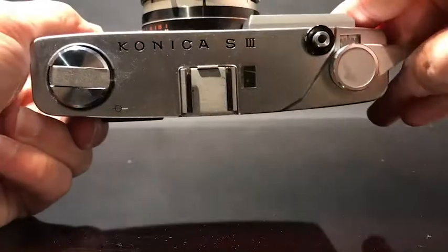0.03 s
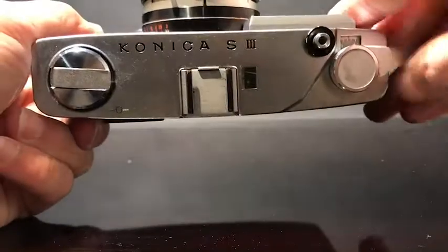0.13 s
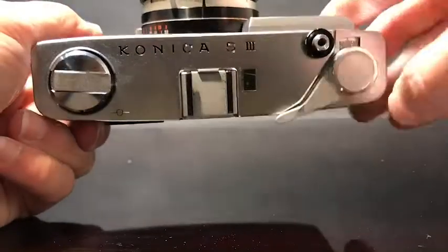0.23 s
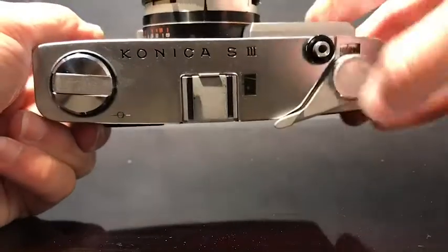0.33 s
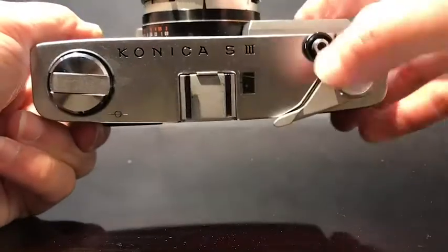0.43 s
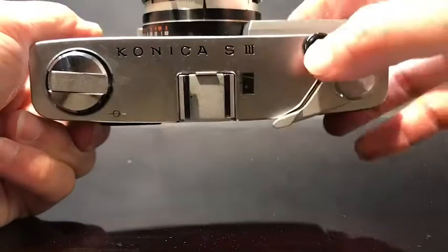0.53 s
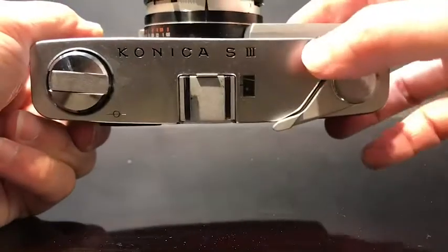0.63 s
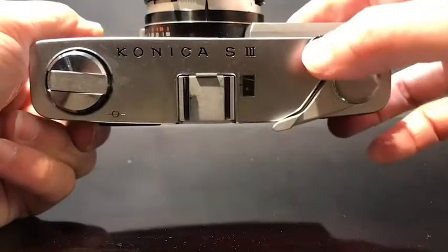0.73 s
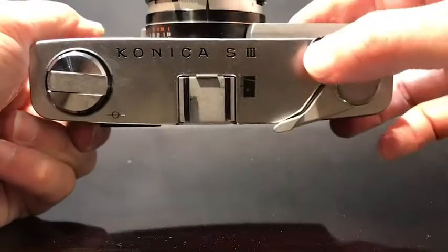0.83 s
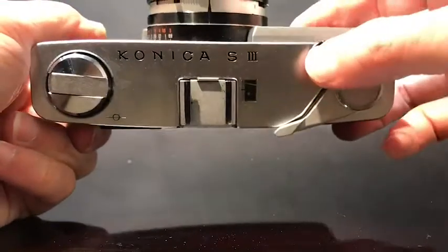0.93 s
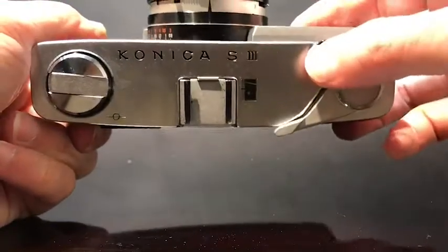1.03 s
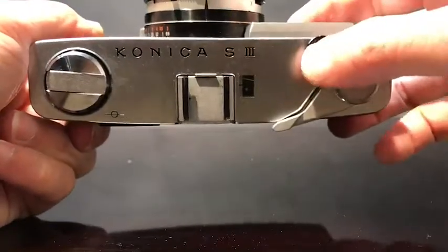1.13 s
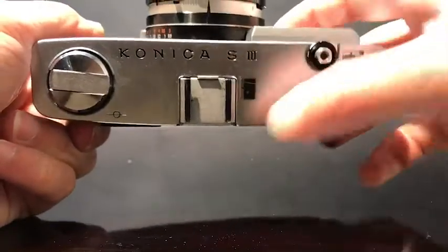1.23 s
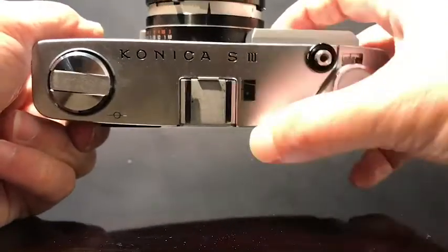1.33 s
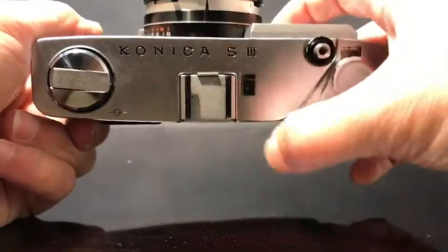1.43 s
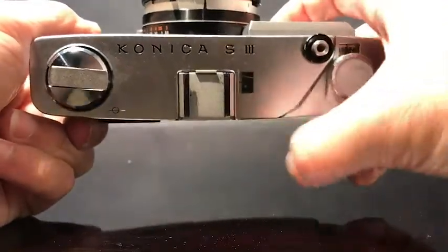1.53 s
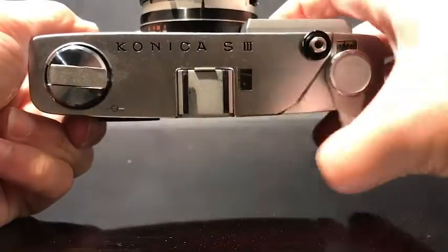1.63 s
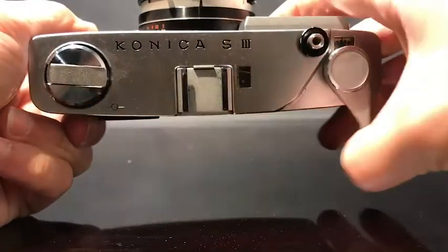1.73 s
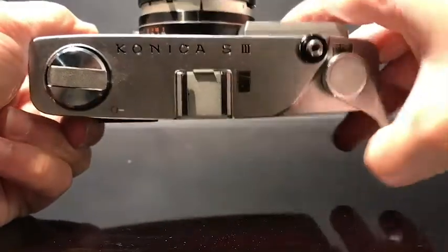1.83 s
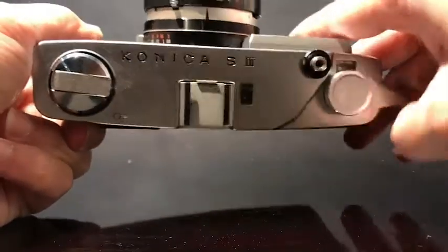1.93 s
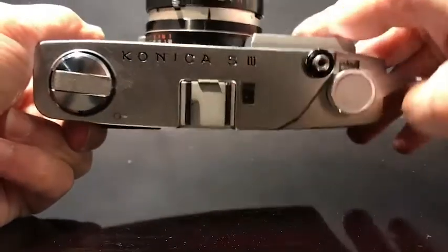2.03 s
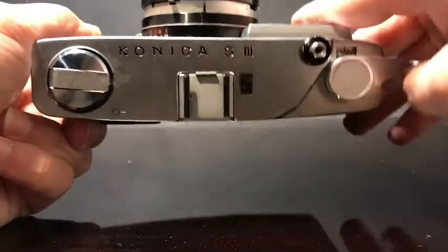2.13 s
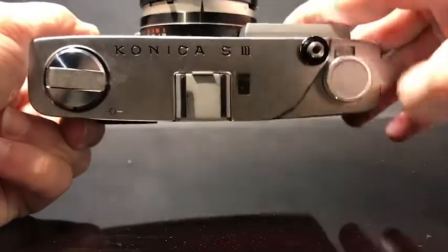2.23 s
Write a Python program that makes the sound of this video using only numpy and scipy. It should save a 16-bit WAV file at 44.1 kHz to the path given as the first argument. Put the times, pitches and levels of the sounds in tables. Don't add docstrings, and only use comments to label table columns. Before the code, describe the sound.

Mechanical camera clicks: a hard lever clack, shutter firing, button springing back, quick ratchet winding

```python
import sys
import numpy as np
from scipy import signal
from scipy.fft import rfft, irfft
from scipy.io import wavfile

SR = 44100
rng = np.random.default_rng(int(sys.argv[2]) if len(sys.argv) > 2 else 0)


def voltage_ratio(level):
    return 10 ** (np.asarray(level, float) / 20)


def wav_record(signal):
    frames = np.transpose(np.atleast_2d(signal))
    bounded = np.clip(frames, -1, 1)
    quanta = np.round(bounded * 32767).astype(np.int16)
    wavfile.write(sys.argv[1], SR, quanta)


N = 101430
LOW_CUT_HZ = 214


def seconds():
    return np.arange(N) / SR


def rms_one(x):
    return x / np.sqrt(np.mean(x ** 2) + 1e-20)


def curve(rows):
    return np.interp(seconds(), *np.transpose(rows))


def highpass(x, order, cut_hz):
    return signal.sosfilt(signal.butter(order, cut_hz, "high", fs=SR, output="sos"), x)


def coloured(points):
    hz, db = np.transpose(points)
    f = np.maximum(np.arange(N // 2 + 1) * SR / N, 1)
    gain_db = np.interp(np.log(f), np.log(hz), db, left=-90)
    return rms_one(irfft(rfft(rng.standard_normal(N)) * voltage_ratio(gain_db), N))


def bursts(s, db, decay_ms):
    age_s = seconds() - np.asarray(s)[:, None]
    decay_s = np.reshape(decay_ms, (-1, 1)) / 1000
    shape = (age_s >= 0) * np.exp(-np.maximum(age_s, 0) / decay_s)
    return voltage_ratio(db) @ shape


def ring(force, modes):
    out = 0
    kick = np.diff(force, prepend=0) + 1e-18
    for k, (hz, db, t60_s) in enumerate(modes):
        r = voltage_ratio(-60 / (t60_s * SR))
        w = 2 * np.pi * hz / SR
        gain = np.sin(w) / (2 * np.sin(w / 2))
        mode = signal.lfilter([gain], [1, -2 * r * np.cos(w), r * r], kick)
        out = out + (-1) ** k * voltage_ratio(db) * mode
    return out


def strike(envelope, colour, modes, ring_db, tail):
    tail_colour, tail_db, t60_s = tail
    crack = envelope * coloured(colour) / 2
    blows = np.maximum(np.diff(envelope, prepend=0), 0)
    body = voltage_ratio(ring_db) * ring(blows, modes)
    wash_power = signal.lfilter([1 / 200], [1, -voltage_ratio(-120 / (t60_s * SR))], envelope ** 2)
    wash = voltage_ratio(tail_db) * np.sqrt(wash_power) * coloured(tail_colour)
    return highpass(crack + body + wash, 4, LOW_CUT_HZ)


def lever():
    # t/s, level/dB, decay/ms
    lever_contacts = [
        (0.2232, -26.5, 0.56),
        (0.2336, -14.5, 1.6),
        (.2380, -9, 4.1),
        (0.2412, -20, 2.6),
        (0.2451, -6, 1.35),
        (0.2469, 0.5, 0.8),
        (0.2502, -18.5, 5),
        (0.26, -19, 1.5),
    ]
    # f/Hz, level/dB
    lever_colour = [(350, -51), (600, -3.5), (3480, -2.5), (7520, -5.5), (13600, -1.5), (16000, 0.5)]
    # f/Hz, level/dB, t60/s
    lever_modes = [(564, 1, 0.018), (1090, -16, 0.011), (8370, 15, 0.003)]
    # spectrum (f/Hz, level/dB), level/dB, t60/s
    lever_tail = [(500, -4.5), (2000, -9), (8000, -1.5), (14000, -6.5), (16000, -3)], -28.5, 0.29
    stop_hits = [.24476, .24672]
    dip_s, dip_db = .00015, 1.5
    age = (seconds() - np.array(stop_hits)[:, None]) / dip_s
    push = np.sum(np.exp(-4 * age ** 2) - voltage_ratio(dip_db) * np.exp(-4 * (age + 1) ** 2), axis=0)
    stop = voltage_ratio(-5.5) * signal.lfilter(*signal.butter(1, 450, "high", fs=SR), push)
    return strike(bursts(*np.transpose(lever_contacts)), lever_colour, lever_modes, -19, lever_tail) + stop


def jolt():
    rise_s, decay_s = 0.0028, 0.0094
    end_hz, extra_turns, glide_s = 53.7, 1.1, 0.0026
    age_s = np.maximum(seconds() - .2472, 0)
    turns = end_hz * age_s + extra_turns * (1 - np.exp(-age_s / glide_s))
    swing = (1 - np.exp(-age_s / rise_s)) * np.exp(-age_s / decay_s) * np.sin(2 * np.pi * turns)
    rebound_s, rebound_length_s, rebound_hz = .297, .055, 48
    late = np.clip((seconds() - rebound_s) / rebound_length_s, 0, 1)
    rebound = np.sin(np.pi * late) * np.sin(2 * np.pi * rebound_hz * seconds())
    return voltage_ratio(2) * swing + voltage_ratio(-40) * rebound


def shutter():
    # t/s, level/dB, decay/ms
    blades = [
        (.9288, -6.5, 1.6),
        (.9303, 0, .8),
        (.9319, -15.5, 1.5),
        (0.933, -23.5, 4.1),
        (.9393, -22.5, 2.0),
        (.9405, -13.5, 1.5),
        (.9430, -13, 1.0),
        (.9444, -17, 2.0),
        (0.9552, -25, 1.0),
        (.962, -37.5, 40),
    ]
    # f/Hz, level/dB
    shutter_colour = [(700, -17), (1600, -12), (4000, -1), (6500, -8), (8200, -10.5), (13500, -0.5),
                      (15300, -8.5), (16500, -34.5)]
    # f/Hz, level/dB, t60/s
    shutter_modes = [(330, -12, 0.019), (490, -1, 0.02), (605, -5, 0.039), (748, -7, 0.048),
                     (1107, -3, 0.035), (3860, 4.5, 0.0092), (4560, 4, 0.0099), (6630, 16.5, 0.0069),
                     (13500, 9, 0.006)]
    # spectrum (f/Hz, level/dB), level/dB, t60/s
    shutter_tail = [(410, -45.5), (700, -13), (1750, -13), (3840, 0), (7110, -10), (13500, -8),
                    (16000, -8.5)], -25.5, 0.28
    # t/s, level/dB, decay/ms
    whir_rub = (.9058, -31, 37)
    whir_from_s, whir_to_s, whir_hz, whir_db, weaker_db = .9078, .926, 357, -24, -6
    tooth_s = np.arange(whir_from_s, whir_to_s, .5 / whir_hz)
    count = len(tooth_s)
    tooth_db = whir_db + weaker_db * (np.arange(count) % 2) + 1.5 * rng.standard_normal(count)
    whir = bursts(tooth_s, tooth_db, 1.0)
    whir += bursts(*np.transpose([whir_rub])) * (seconds() < whir_to_s)
    contacts = whir + bursts(*np.transpose(blades))
    return strike(contacts, shutter_colour, shutter_modes, -23, shutter_tail)


def button():
    # t/s, level/dB, decay/ms
    button_contacts = [
        (1.1758, -15.5, 0.84),
        (1.1783, -16.5, 0.52),
        (1.17795, -2, 1.27),
        (1.1797, -18, 0.94),
        (1.184, -32, 2.6),
        (1.1884, -30, 2.7),
        (1.1888, -28.5, 2.5),
    ]
    # f/Hz, level/dB
    button_colour = [(900, -28), (2500, 1), (4200, -26.5), (8500, -15), (12000, -12.5), (16500, -11.5)]
    # f/Hz, level/dB, t60/s
    button_modes = [(751, -25.5, 0.055), (1084, -14.5, 0.041), (1260, -13, 0.033), (1660, -19.5, 0.017),
                    (2330, -5, 0.015), (2066, -8.5, 0.0128), (2800, -4, 0.012), (2560, -24, .03),
                    (3020, -13.5, 0.016), (4250, -17, .01), (5300, -6.5, 0.014), (7850, 3.5, 0.0075),
                    (9610, 2, 0.0061), (10650, -3.5, 0.0055), (11800, -5.5, 0.0059)]
    # spectrum (f/Hz, level/dB), level/dB, t60/s
    button_tail = [(410, -43), (700, -7.5), (1750, -13.5), (1970, -11), (2460, 2), (4320, -23), (5190, -10),
                   (9730, -13), (16000, -21.5)], -30.5, 0.3
    snap = strike(bursts(*np.transpose(button_contacts)), button_colour, button_modes, -6, button_tail)
    return highpass(snap, 2, 2 * LOW_CUT_HZ)


def winding():
    # t/s, level/dB, body knock/dB, pawl ring f/Hz
    teeth = [(1.5165, -15.5, -14, 14000), (1.5190, -27, -9.5, 7150), (1.5313, -34.5, 8, 13200),
             (1.592, -53.5, 21, 6000), (1.6029, -19.5, -4.5, 14200), (1.6283, -21, -3, 7240),
             (1.6554, -19, -4, 11700), (1.668, -42, 0, 13000), (1.6873, -20.5, -3, 7000),
             (1.700, -42, -5, 12000), (1.714, -37.5, 11, 11400), (1.7245, -21.5, -15, 12000),
             (1.7437, -15.5, -5, 9350), (1.7508, -18.5, -11, 11800), (1.7754, -21, -3.5, 12000),
             (1.79, -42, -6, 14500), (1.8055, -22.5, -6, 11700), (1.8235, -17.5, -21, 12000),
             (1.8293, -21.5, -9, 11400), (1.8458, -17, -11, 12800), (1.852, -31, 3, 15000),
             (1.857, -33, 8, 15000), (1.861, -14.5, -9, 12100), (1.867, -32, 0, 14500),
             (1.8737, -18.5, -2, 10500), (1.8755, -26, -4, 6740), (1.8856, -15, -5.5, 14000),
             (1.8877, -15.5, -1, 12500), (1.8961, -15.5, -7, 14000), (1.9073, -13, -14, 12500),
             (1.9221, -14.5, -11.5, 12600), (1.9241, -16.5, 5, 3830), (1.9272, -17, -9.5, 14200),
             (1.938, -18.5, -9, 13700), (1.9681, -15.5, -11.5, 14600), (1.9952, -20.5, 1, 9060),
             (2.0146, -18.5, -9, 12200), (2.0213, -28.5, 6.5, 5250), (2.028, -30.5, 2.5, 8800)]
    # f/Hz, level/dB
    tooth_colour = [(1200, -13), (3900, -8), (6600, 2), (9100, 0.5), (11000, 1), (14500, 7), (15700, 7.5),
                    (16600, -22)]
    # f/Hz, level/dB, t60/s
    body_modes = [(435, -18.5, 0.031), (602, -5.5, 0.039), (746, -3, 0.035), (1090, -9.5, 0.052),
                  (1710, -5, 0.026), (2455, -1, 0.0083), (3360, 0.5, 0.0056), (3960, -1, 0.013)]
    # spectrum (f/Hz, level/dB), level/dB, t60/s
    pawl_tail = [(1000, -1), (4000, -7), (12000, -8), (16000, -6)], -21.5, 0.16
    tooth_decay_ms, tooth_rise_ms = 1.6, 0.2
    s, db, knock_db, ring_hz = np.transpose(teeth)
    rise = np.exp(-1000 / (tooth_rise_ms * SR))
    drops = signal.lfilter([1 - rise], [1, -rise], bursts(s, db - .5, tooth_decay_ms))
    pawl = strike(drops, tooth_colour, [], 0, pawl_tail)
    rattle = rng.standard_normal(N)
    for tooth_s, tooth_db, hz in zip(s, db, ring_hz):
        pawl += ring(bursts([tooth_s], [tooth_db], tooth_decay_ms) * rattle, [(hz, -23.5, 0.0056)])
    knock = 0
    for mode in body_modes:
        mode_db = db + knock_db + 2.9 * rng.standard_normal(len(s))
        knock = knock + ring(bursts(s, mode_db, 3.5) * rng.standard_normal(N), [mode])
    return pawl + voltage_ratio(-38) * knock


def drag():
    # t/s, level/dB
    drag_level = [
        (1.56, -68),
        (1.60, -40),
        (1.66, -52.5),
        (1.80, -55.5),
        (1.85, -41),
        (1.93, -38.5),
        (1.95, -44.5),
        (2.025, -47),
        (2.04, -53.5),
        (2.08, -59),
    ]
    # f/Hz, level/dB
    drag_colour = [(210, -53.5), (350, -14), (742, 9), (871, -2), (1730, -9), (1940, -13), (3340, -5),
                   (14500, -10), (16000, 0.5)]
    grit = np.repeat(voltage_ratio(1.1 * rng.standard_normal(N // 64 + 1)), 64)[:N]
    return voltage_ratio(curve(drag_level)) * grit * coloured(drag_colour)


def ticks():
    # t/s, level/dB, f/Hz
    tick_events = [(.143, -48.5, 11600), (0.151, -51, 12100), (.181, -50, 8900), (0.203, -62, 12000),
                   (.535, -48.5, 7950), (.665, -52, 8100), (0.776, -52, 13500), (1.455, -52, 12000),
                   (1.9265, -21.5, 2970), (1.9267, -25, 4290), (2.236, -46.5, 12300), (2.272, -54.5, 14100),
                   (2.292, -46, 12100)]
    out = np.zeros(N)
    for s, db, hz in tick_events:
        force = bursts([s], [db], 1.0) * rng.standard_normal(N)
        out += ring(force, [(hz, -12, 0.007)]) + voltage_ratio(-3.5) * np.diff(force, prepend=0)
    return out


def nudges():
    # t/s, level/dB, f/Hz
    nudge_events = [
        (0.454, -50, 1120),
        (.455, -49, 606),
        (0.776, -40, 260),
        (.895, -47, 130),
        (1.098, -45, 270),
        (1.16, -51.5, 300),
        (1.595, -42, 400),
    ]
    rub = rng.standard_normal(N)
    return sum(ring(bursts([s], [db], 20) * rub, [(hz, -22, .022)]) for s, db, hz in nudge_events)


def fingers():
    # t/s, level/dB
    finger_level = [(0, -63.5), (.2, -67.5), (.44, -56.5), (.47, -56.5), (.76, -59), (.79, -56), (.88, -62),
                    (1.1, -67.5), (1.3, -65), (1.42, -71.5), (1.5, -67.5), (2.1, -65.5), (2.3, -74)]
    # f/Hz, level/dB
    finger_colour = [(180, -30), (300, -15.5), (441, -20.5), (583, -0.5), (844, -15), (1180, -3.5),
                     (2230, -3.5), (12000, -17.5), (15600, -50), (22000, -120)]
    return voltage_ratio(curve(finger_level)) * coloured(finger_colour)


def creep():
    # t/s, level/dB
    creep_level = [
        (.17, -84),
        (.20, -58.5),
        (.232, -46.5),
        (.24, -80),
        (1.13, -80),
        (1.15, -49),
        (1.175, -47),
        (1.18, -86.5),
    ]
    # f/Hz, level/dB
    creep_colour = [(1500, 7.5), (5000, -9.5), (8600, -2.5), (10000, -13.5), (12500, -7), (16000, -3.5)]
    return voltage_ratio(curve(creep_level)) * coloured(creep_colour)


def room():
    # f/Hz, level/dB
    air_colour = [(25, -5.5), (55, -0.5), (95, -17), (130, -11), (230, -9.5), (620, -15.5), (3000, -29.5),
                  (16000, -45), (16500, -68.5)]
    hum = rms_one(ring(rng.standard_normal(N), [(121.7, 0, .5)]))
    return voltage_ratio(-56) * coloured(air_colour) + voltage_ratio(-66.5) * hum


def scene():
    camera = lever() + shutter() + button() + winding() + drag() + ticks() + nudges()
    duck_db, from_s, to_s = -6, .30, .447
    duck = curve([(from_s - .02, 0), (from_s, duck_db), (to_s, duck_db), (to_s + 0.01, 0)])
    background = room() + fingers() + creep()
    return (camera + jolt() + voltage_ratio(duck) * background)[None]


def band_limit(x):
    return signal.sosfilt(signal.butter(12, 16830, fs=SR, output="sos"), x)


def record(dry):
    top_cut = signal.cheby2(10, 60, 16760, fs=SR, output="sos")
    mix = signal.sosfilt(top_cut, np.clip(dry, -1, 1))
    return band_limit(mix)


dry = scene()
out = record(dry)
wav_record(out)
```